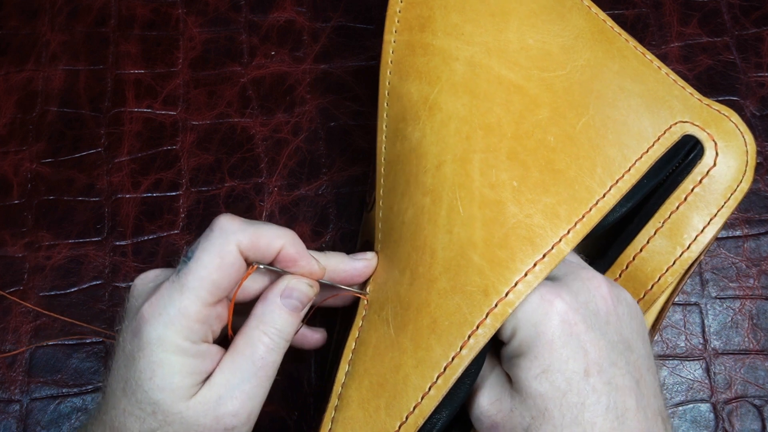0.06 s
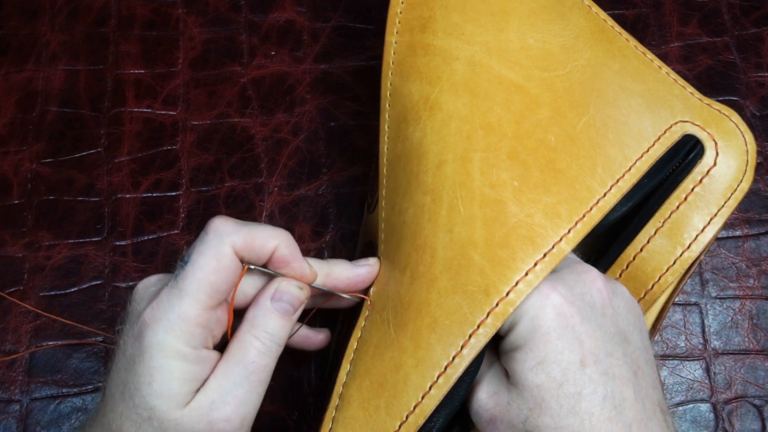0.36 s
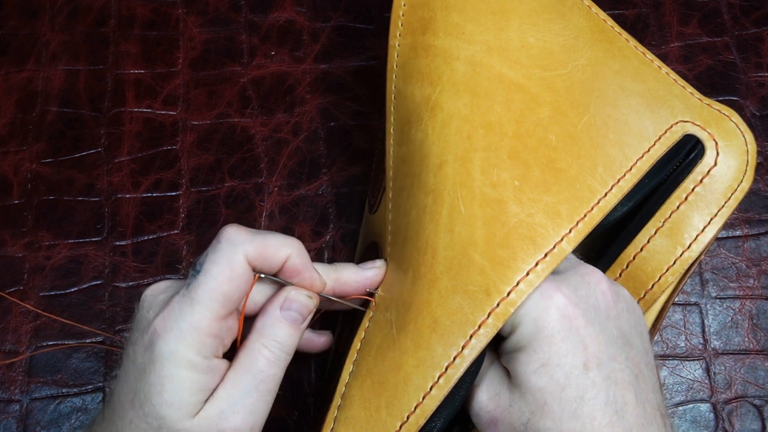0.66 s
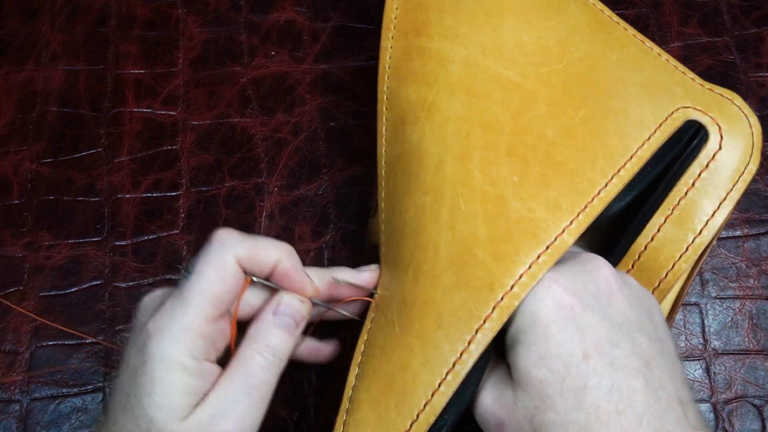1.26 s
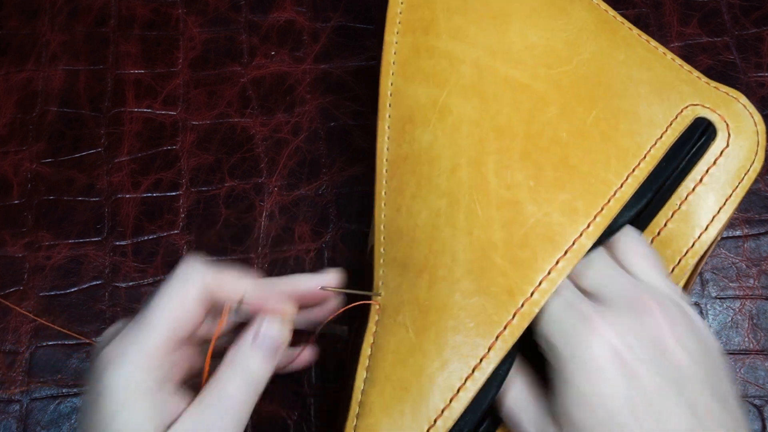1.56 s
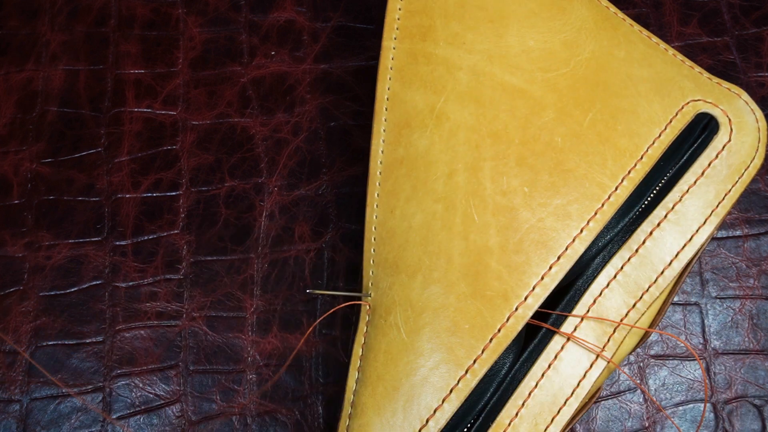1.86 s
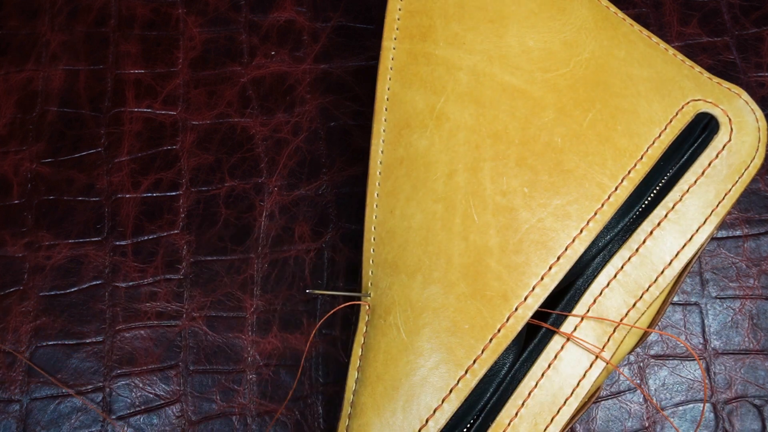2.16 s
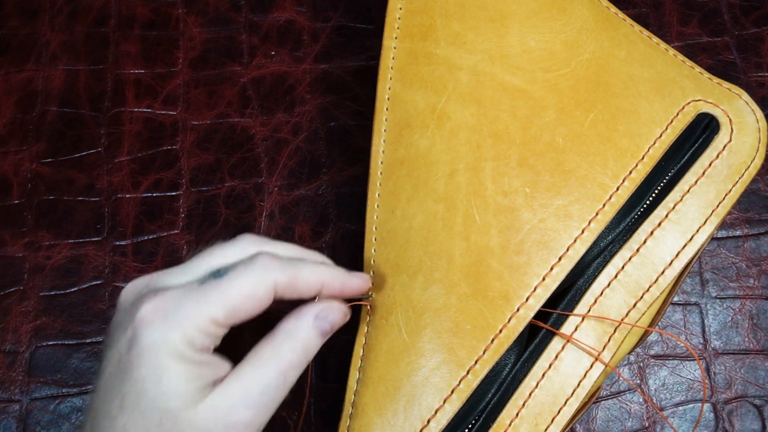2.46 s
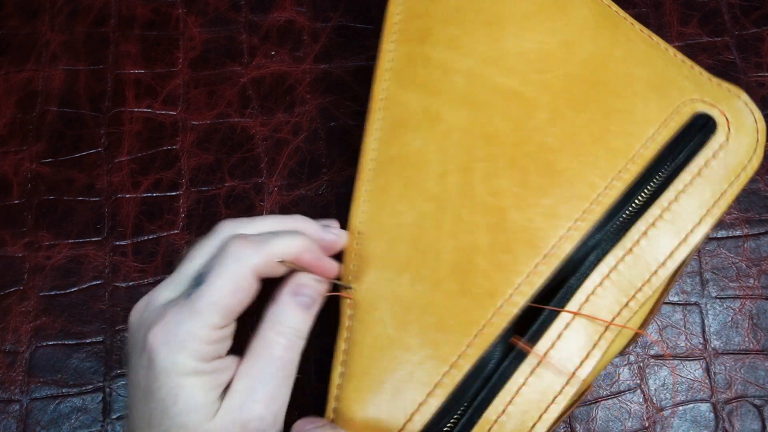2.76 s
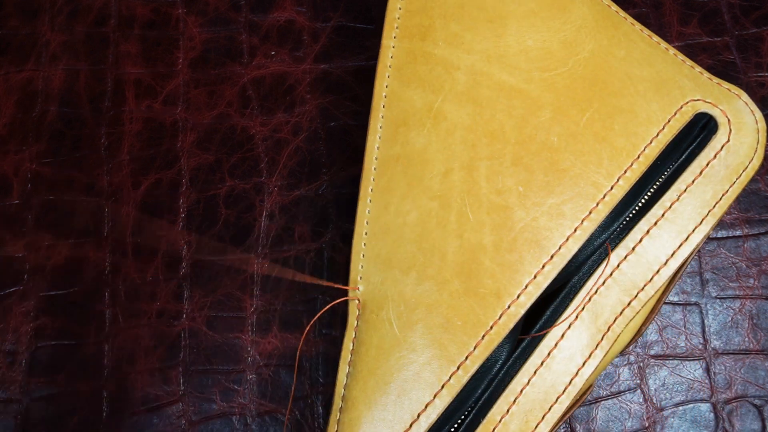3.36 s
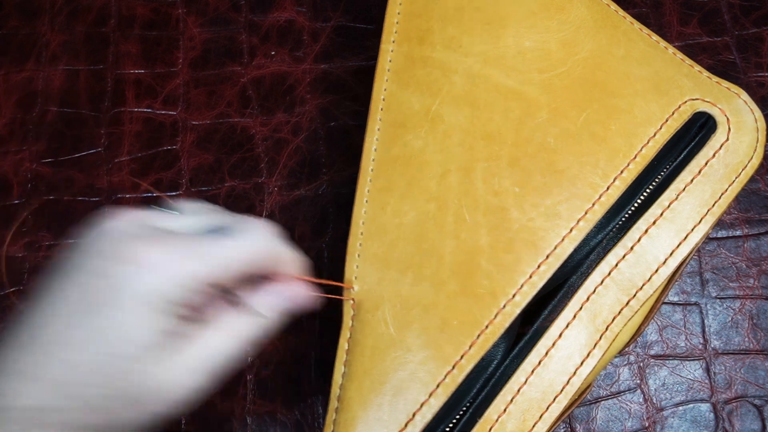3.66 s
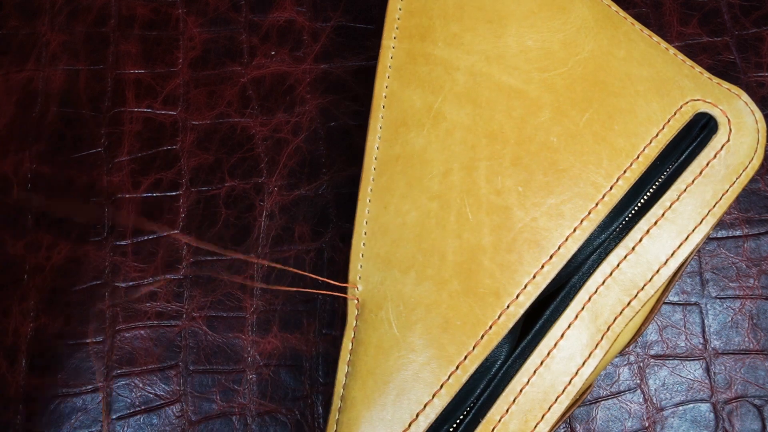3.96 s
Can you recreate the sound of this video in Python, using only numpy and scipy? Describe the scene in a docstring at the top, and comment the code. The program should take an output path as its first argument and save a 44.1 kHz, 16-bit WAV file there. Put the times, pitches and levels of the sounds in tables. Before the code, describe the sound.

Leather is stitched by hand, close up in a quiet workshop. Fingers rub the hide while a needle ticks and slips through with small dull thuds. Slack thread hisses away, then three louder rasping pulls draw the thread through.

```python
"""Hand-stitching a leather bag

Close up in a quiet workshop, fingers rub the hide and the needle ticks, scrapes and slips through
a hole, each slip jolting the leather panel. Slack thread slides away. The needle's eye jerks free,
shaking the bag, and the thread sticks and slips through in three rasping pulls that drive the panel."""
import sys
import numpy as np
from scipy import signal
from scipy.fft import rfft, irfft
from scipy.io import wavfile

SR = 44100
rng = np.random.default_rng(int(sys.argv[2]) if len(sys.argv) > 2 else 0)


def to_wav(s):
    """Save 16-bit WAV."""
    ch = np.atleast_2d(s).T  # columns
    pcm = np.round(np.clip(ch, -1, 1) * 32767)  # PCM
    wavfile.write(sys.argv[1], SR, pcm.astype(np.int16))


N = 176400
T = np.arange(N) / SR


def from_db(db):
    """Decibels to gain."""
    return 10 ** (np.asarray(db) / 20)


def unit(x):
    """Scale to unit energy."""
    return x / np.sqrt(np.sum(x ** 2) + 1e-20)


def through(x, response):
    """Convolve, keeping the input length."""
    return signal.fftconvolve(x, response)[:len(x)]


def gains(rows):
    """One gain curve per level column; silent outside the rows' time span."""
    times_s, *columns_db = np.transpose(rows)
    return [from_db(np.interp(T, times_s, db, left=-120, right=-120)) for db in columns_db]


def colour(points, size=4096):
    """Minimum-phase impulse response from (frequency [Hz], gain [dB]) points."""
    hz, db = np.transpose(points)
    grid_hz = np.maximum(np.fft.rfftfreq(size, 1 / SR), 1)
    magnitude = from_db(np.interp(np.log(grid_hz), np.log(hz), db))
    cepstrum = irfft(np.log(magnitude))
    cepstrum[1:size // 2] *= 2   # fold onto the causal half
    cepstrum[size // 2 + 1:] = 0
    return irfft(np.exp(rfft(cepstrum)))


def steady(x, points):
    """Colour a continuous sound; unit rms."""
    return unit(through(x, colour(points))) * np.sqrt(N)


def flutter(hz):
    """Low-passed random wavering; unit rms."""
    lowpass = signal.butter(2, hz, fs=SR, output="sos")
    return unit(signal.sosfilt(lowpass, rng.standard_normal(N))) * np.sqrt(N)


def slips(per_s, spread_db):
    """Friction: a random train of tiny slips of uneven size."""
    sizes = from_db(spread_db * np.minimum(rng.exponential(1, N), 4))
    return (rng.random(N) < per_s / SR) * sizes * rng.choice([-1, 1], N)


def burst(decay_s, size=4096):
    """Decaying noise; unit energy."""
    return unit(rng.standard_normal(size) * np.exp(-T[:size] / decay_s))


def contact(response, decay_s, scatter=1):
    """One sharp slip and its after-slips through a response; energy of 5 ms at unit rms."""
    force = scatter * burst(decay_s)
    force[0] += 1
    return unit(through(force, response)) * np.sqrt(.005 * SR)


def add(out, start_s, sound):
    """Mix a sound in at start_s."""
    i = int(start_s * SR)
    out[..., i:i + sound.shape[-1]] += sound[..., :N - i]


def pan(x, db):
    """Mono to stereo; db is left over right."""
    return x * from_db(np.array([[db], [-db]]) / 2)


# room tone spectrum: (frequency [Hz], gain [dB])
ROOM_TONE_COLOUR = [(12, -27), (20, -12), (70, -3), (113, 2), (177, -9), (222, -5), (262, -14.5),
                    (678, -15), (949, -24.5), (1660, -22), (1810, -25), (2020, -23.5), (3530, -28),
                    (11100, -31), (16000, -31.5)]
# room tone width: (frequency [Hz], side over mid [dB])
ROOM_TONE_WIDTH = [(60, -25), (400, 0.5), (1500, 3.5), (5000, 0.5), (14000, -1.5)]


def room_tone(level_db=-57.5):
    """Faint central rumble and wide hiss."""
    mid, side = (steady(rng.standard_normal(N), ROOM_TONE_COLOUR) for _ in range(2))
    side = through(side, colour(ROOM_TONE_WIDTH))
    return from_db(level_db) * np.array([mid + side, mid - side])


# finger friction envelopes: (time [s], rub level [dB], brush level [dB])
FINGER_LEVELS = [(0, -76, -86), (.1, -63, -78), (.135, -61.5, -55.5), (.175, -55.5, -59.5), (.24, -67, -71),
                 (.74, -65.5, -75), (.83, -66, -64.5), (.92, -60.5, -62.5), (.99, -59, -70),
                 (1.04, -54, -57.5), (1.09, -51, -58), (1.16, -62, -66), (1.24, -47.5, -61.5),
                 (1.31, -54.5, -61.5), (1.38, -58, -58), (1.46, -50, -63), (1.55, -54, -60),
                 (1.7, -48, -51.5), (1.78, -60, -64), (1.92, -69, -67), (2.01, -68.5, -62),
                 (2.1, -69.5, -73), (2.42, -69, -63.5), (2.52, -62.5, -60.5), (2.6, -64.5, -56),
                 (2.67, -57, -59), (2.695, -41, -54), (2.75, -53, -53), (2.81, -53, -46.5), (2.9, -58, -61)]
# rub and brush spectra: (frequency [Hz], gain [dB])
RUB_COLOUR = [(60, -34), (160, -11), (330, -1), (450, -2), (650, -1.5), (1000, -7), (2000, -19.5),
              (5000, -75)]
BRUSH_COLOUR = [(400, -18), (1000, -6), (1700, -3.5), (2400, -2), (3600, -6.5), (7000, -12.5), (16000, -19)]


def fingers():
    """Fingers slip over the hide: a dull rub and a dry brush."""
    rub_gain, brush_gain = gains(FINGER_LEVELS)
    rub = rub_gain * steady(slips(per_s=900, spread_db=3.5), RUB_COLOUR)
    brush = brush_gain * steady(slips(per_s=2600, spread_db=1), BRUSH_COLOUR)
    return pan(rub + brush, db=-1.6)


# needle and nail clicks: (time [s], level [dB], centre [Hz], pan [dB])
TICKS = [(0.117, -46.5, 6240, -9.5), (.150, -68, 4000, -11), (0.172, -53.5, 4640, -13),
         (.756, -55, 6400, -12), (0.8205, -50.5, 5260, -5), (1.0116, -49.5, 3300, -8),
         (1.0348, -54, 3480, -14), (1.432, -67, 6000, -1), (1.456, -59, 5000, -14), (1.478, -52, 5000, 4),
         (1.6524, -36.5, 5600, -7), (2.154, -53.5, 7300, 2), (2.484, -60, 7000, 16),
         (2.4978, -40, 3700, 2.5), (2.537, -44, 2860, -1), (2.583, -49.5, 3500, 6), (2.627, -50.5, 2840, 8),
         (2.7162, -40, 2800, 0), (2.816, -48, 8000, 11), (2.8765, -44.5, 7000, 0), (2.903, -36, 7400, 2),
         (3.547, -47, 4760, 11.5), (3.681, -58.5, 8000, 15)]
# click spectrum: (frequency [x centre], gain [dB])
TICK_SHAPE = [(.08, -9), (.2, -6), (.45, -7.5), (.7, -0.5), (1, 0.5), (1.5, -7.5), (2.5, -13.5), (5, -17)]


def ticks():
    """Needles and fingernails click, bright and with no ring."""
    out = np.zeros((2, N))
    for start_s, db, centre_hz, pan_db in TICKS:
        response = colour([(centre_hz * ratio, gain_db) for ratio, gain_db in TICK_SHAPE])
        click = from_db(db) * contact(response, decay_s=.0029)
        add(out, start_s, pan(click, pan_db))
    return out


# needle slips: (time [s], thud level [dB], crack level [dB], panel pitch [ratio])
JOLTS = [(.301, -48, -71, 1.1), (.3622, -30, -36.5, 1.06), (.7925, -41.5, -63, 0.55),
         (.8205, -40.5, -52.5, 1.5), (1.0825, -34, -50.5, 0.98), (1.128, -39, -46.5, 0.94),
         (1.194, -39, -58, 0.56), (1.245, -52, -50, 1.5), (1.269, -54, -52.5, 1), (1.3585, -38, -48, 1.03),
         (1.396, -33.5, -41, 1.16), (1.4271, -31, -50, 0.81), (1.434, -37.5, -41.5, 0.77),
         (1.456, -59, -48.5, 0.7), (1.478, -41.5, -59, 0.37), (1.507, -42.5, -47.5, 0.36),
         (1.6522, -39, -39.5, 1.01), (1.692, -42, -60, 1.27), (1.703, -37, -66, 0.98),
         (2.685, -41.5, -46, 0.89), (2.787, -37, -51, 1.18), (2.816, -30, -40.5, 1.27),
         (2.836, -27.5, -32, 0.75), (2.860, -33, -54, 0.8), (2.8765, -17, -35, 0.92),
         (2.9033, -17.5, -55, 0.96), (3.002, -21, -46, 1.25), (3.2005, -35, -52, 0.66),
         (3.208, -27.5, -47, 1.46), (3.5455, -52.5, -47.5, 1.56), (3.8125, -30, -62, 1.43),
         (3.858, -29, -55, 1.9), (3.891, -27.5, -53, 1.14), (3.903, -38, -66, 1.5)]
# panel modes at pitch ratio 1: (frequency [Hz], level [dB], T60 [s])
PANEL_MODES = [(230, -20.5, 0.043), (303, -6, 0.026), (417, 13, 0.02), (520, -5, 0.019), (593, -1, 0.021),
               (900, -20, 0.0058), (1240, -4, 0.016)]
# crack spectrum: (frequency [Hz], gain [dB])
CRACK_COLOUR = [(500, -19.5), (1300, -14), (1650, 3.5), (2050, 10.5), (2700, -4), (3550, 0), (4000, -8),
                (4500, -8.5), (6000, -14), (8000, -18), (16000, -28)]


def jolts(size=4096):
    """Each needle slip cracks and thuds the leather panel, whose pitch depends on the grip."""
    t, out = T[:size], np.zeros(N)
    radiation = signal.butter(2, [160, 1100], "band", fs=SR, output="sos")
    crack = colour(CRACK_COLOUR)
    for start_s, thud_db, crack_db, pitch in JOLTS:
        modes = sum(from_db(db - 60 * t / t60_s) * np.cos(2 * np.pi * pitch * hz * t)
                    for hz, db, t60_s in PANEL_MODES)
        panel = signal.sosfilt(radiation, modes)
        add(out, start_s, -from_db(thud_db) * contact(panel, decay_s=.0054, scatter=.73))
        add(out, start_s, from_db(crack_db) * contact(crack, decay_s=.0052))
    return pan(out, db=-1.5)


# short scrapes: (time [s], length [s], level [dB], centre [Hz])
SCRAPES = [(1.21, .07, -56.5, 2240), (1.946, 0.14, -62.5, 2000), (2.515, 0.061, -53.5, 2840),
           (2.584, 0.067, -50, 2540), (2.707, 0.068, -53.5, 2900), (2.897, 0.014, -35.5, 3170),
           (3.232, 0.017, -38, 2260), (3.758, 0.041, -40.5, 1660)]


def scrapes():
    """Needle and waxed thread scrape: narrow grainy bands that swell and fade."""
    out = np.zeros(N)
    for start_s, length_s, db, centre_hz in SCRAPES:
        band = signal.butter(1, centre_hz * np.exp([-.14, .14]), "band", fs=SR, output="sos")
        grains = signal.sosfilt(np.vstack([band, band]), slips(per_s=2500, spread_db=5))
        swell = np.sin(np.pi * np.clip((T - start_s) / length_s, 0, 1))
        out += from_db(db) * swell * unit(grains) * np.sqrt(N)
    return out


# slack thread envelope: (time [s], level [dB])
SLIDE_LEVELS = [(1.48, -77), (1.54, -51), (1.6, -51), (1.65, -47), (1.7, -49.5), (1.74, -55.5), (1.79, -72),
                (2.05, -88)]
# slack thread spectrum: (frequency [Hz], gain [dB])
SLIDE_COLOUR = [(600, 4), (1500, -5.5), (3000, -1), (5000, -1), (8000, -2.5), (11000, -6.5), (16000, -10)]


def thread_slide():
    """Slack thread slides away with the far hand in a hiss of dense slips."""
    hiss = steady(slips(per_s=11000, spread_db=3), SLIDE_COLOUR)
    return pan(gains(SLIDE_LEVELS)[0] * hiss, db=-3.5)


# bag heave envelope: (time [s], level [dB])
HEAVE_LEVELS = [(2.79, -65), (2.825, -30), (2.86, -38.5), (2.91, -29), (2.96, -46), (3.01, -39.5),
                (3.06, -54)]
# bag heave spectrum: (frequency [Hz], gain [dB])
HEAVE_COLOUR = [(15, -9), (35, -14), (75, -5), (140, -4.5), (280, -7.5), (400, 0.5), (800, -53)]


def heave():
    """The bag heaves with low noise as the needle's eye passes."""
    return gains(HEAVE_LEVELS)[0] * steady(rng.standard_normal(N), HEAVE_COLOUR)


# hide and thread resonances: (frequency [Hz], bandwidth [Hz], gain [dB])
RESONANCES = [(405.4, 14, 13.5), (491, 27, 7), (605, 20, 8.5), (676, 70, 3.5), (1253, 26, 8),
              (2150, 100, 4.5), (2480, 100, 3), (3330, 55, 6), (4770, 57, 9), (5800, 120, 0.5),
              (6300, 110, -1)]


def resonate(x):
    """The taut hide and thread favour a few narrow pitches."""
    return x + sum((from_db(db) - 1) * signal.lfilter(*signal.iirpeak(hz, hz / width_hz, fs=SR), x)
                   for hz, width_hz, db in RESONANCES)


# pull envelopes: (time [s], drone level [dB], rasp level [dB])
PULL_1 = [(2.79, -76, -63), (2.82, -30, -61), (2.898, -38.5, -48.5), (2.907, -22.5, -32.5),
          (2.93, -33, -37.5), (2.975, -29.5, -35), (3.02, -37.5, -40), (3.12, -43, -43.5), (3.18, -45, -43),
          (3.22, -55, -53)]
PULL_2 = [(3.16, -46, -59), (3.205, -32.5, -40.5), (3.24, -29.5, -34.5), (3.27, -28, -34),
          (3.295, -37, -36), (3.325, -33.5, -44), (3.35, -44, -51), (3.39, -43, -53), (3.46, -69, -65),
          (3.66, -56, -61)]
PULL_3 = [(3.65, -69.5, -66), (3.72, -42, -54), (3.78, -37.5, -38.5), (3.81, -31.5, -38.5),
          (3.85, -30.5, -33), (3.9, -27, -34), (3.93, -24, -36), (3.96, -48, -48.5), (4, -50, -52)]
# panel drone spectrum per pull: (frequency [Hz], gain [dB])
DRONE_1 = [(40, -37), (130, -10.5), (270, -7.5), (410, -5.5), (520, -0.5), (720, -1.5), (900, -5),
           (1100, -8), (1600, -18), (4000, -61)]
DRONE_2 = [(40, -31), (130, -20), (300, -8.5), (420, -4), (520, -2.5), (700, -5.5), (900, -5.5),
           (1100, -14.5), (1600, -16), (4000, -57)]
DRONE_3 = [(40, -40), (120, -15), (270, -17), (340, -8), (400, -0.5), (500, -4), (700, -7.5), (1000, -6),
           (1100, -24), (1600, -16), (4000, -63)]
# thread rasp spectrum per pull: (frequency [Hz], gain [dB])
RASP_1 = [(700, -5.5), (1200, 3.5), (2400, 5.5), (3300, 2.5), (3900, -0.5), (6700, -4.5), (7600, -1),
          (10400, -4.5), (11500, -12), (16000, -14)]
RASP_2 = [(700, -8), (1200, -3), (2300, 0.5), (3300, -3), (3700, -6), (5100, -7.5), (5800, -2.5),
          (6900, -6.5), (8500, -5.5), (10400, -9), (11700, -16), (13200, -13), (14200, -19), (16000, -16)]
RASP_3 = [(700, -13), (1200, 0), (2500, 1.5), (3700, -4), (5000, -6), (5700, 1), (6400, -3.5), (6900, -7.5),
          (8400, -9.5), (9800, -9), (10800, -9), (11400, -17), (14000, -15), (16000, -23)]


def thread_pull(levels, drone_colour, rasp_colour, snag_db=1.35):
    """Thread sticks and slips through the hole, rasping and driving the panel; uneven spots snag."""
    drone_gain, rasp_gain = gains(levels)
    snags = from_db(snag_db * flutter(hz=78))
    drone = drone_gain * steady(resonate(snags * slips(per_s=5000, spread_db=3)), drone_colour)
    rasp = rasp_gain * steady(resonate(snags * slips(per_s=10000, spread_db=3)), rasp_colour)
    treble = signal.sosfilt(signal.butter(1, 4000, "high", fs=SR, output="sos"), rasp)
    return pan(drone, db=-1.1) + pan(rasp - treble, db=-1.4) + pan(treble, db=1)


# hardest tugs: (time [s], level [dB])
THUMPS = [(2.817, -45), (2.877, -29), (2.904, -30)]


def thumps(bounce_hz=145, damping_s=.008, size=4096):
    """Hard tugs give the whole bag a soft, quickly damped bounce."""
    t, out = T[:size], np.zeros(N)
    bounce = np.sin(2 * np.pi * bounce_hz * t) * np.exp(-t / damping_s)
    for start_s, db in THUMPS:
        add(out, start_s, -from_db(db) * contact(bounce, decay_s=.0054, scatter=.45))
    return out


def treble_ripple(x, delay_s=.001599, echo_gain=.1, highpass_hz=1530):
    """A faint, very short echo ripples the treble."""
    treble = signal.sosfilt(signal.butter(1, highpass_hz, "high", fs=SR, output="sos"), x)
    echo = np.array([np.interp(T - delay_s, T, channel, left=0) for channel in treble])
    return x + echo_gain * echo


# room tail spectrum: (frequency [Hz], gain [dB])
TAIL_COLOUR = [(80, -2), (300, 4), (700, -1.5), (2000, -5), (5000, -9), (16000, -19)]
# side-channel reflection spectrum: (frequency [Hz], gain [dB])
SIDE_COLOUR = [(60, -32), (500, -25.5), (1000, -13.5), (2000, -11), (5000, -6), (14000, -4.5)]


def workshop(x, t60_s=.31, predelay_s=.007, tail_db=-9):
    """Short dull room tail; scatter off near surfaces and walls makes left and right differ."""
    mid = x.mean(axis=0)
    tail, side_tail = (burst(t60_s / np.log(1000), size=22050) for _ in range(2))
    tail = np.concatenate([np.zeros(int(predelay_s * SR)), through(tail, colour(TAIL_COLOUR))])
    wet = from_db(tail_db) * through(mid, tail)
    near_scatter = .45 * through(mid, burst(decay_s=.0013))
    wall_scatter = .85 * through(mid, side_tail)
    side = through(near_scatter + wall_scatter, colour(SIDE_COLOUR))
    return x + wet + np.array([side, -side])


def scene():
    """Handwork in the room, plus room tone."""
    pulls = (thread_pull(PULL_1, DRONE_1, RASP_1)
             + thread_pull(PULL_2, DRONE_2, RASP_2)
             + thread_pull(PULL_3, DRONE_3, RASP_3))
    impacts = jolts() + thumps() + ticks()
    handling = scrapes() + fingers() + thread_slide() + heave()
    return workshop(treble_ripple(pulls + impacts + handling)) + room_tone()


def record(dry):
    """Steep low-pass at 15750 Hz."""
    return signal.sosfilt(signal.ellip(12, .1, 80, 15750, fs=SR, output="sos"), dry)


dry = scene()
out = record(dry)
to_wav(out)
```